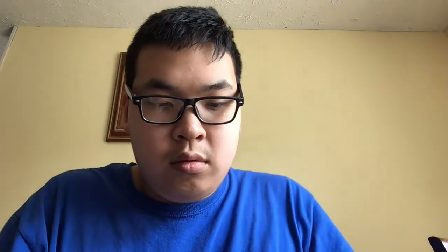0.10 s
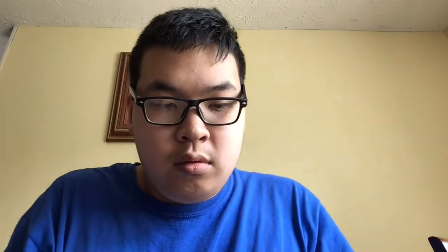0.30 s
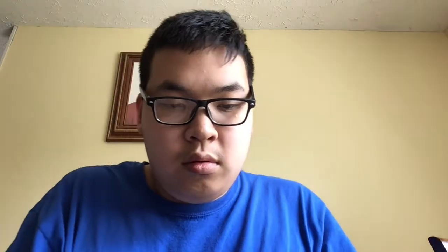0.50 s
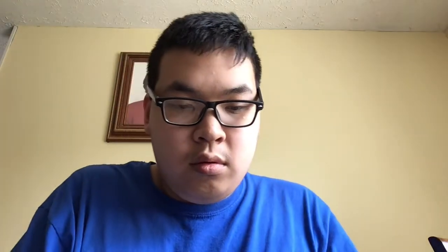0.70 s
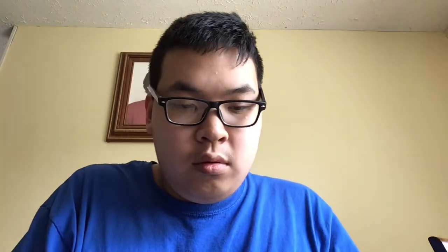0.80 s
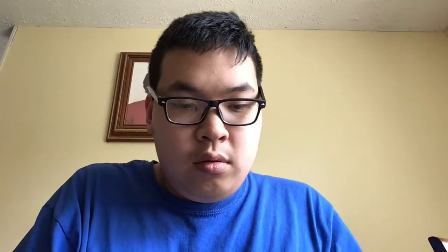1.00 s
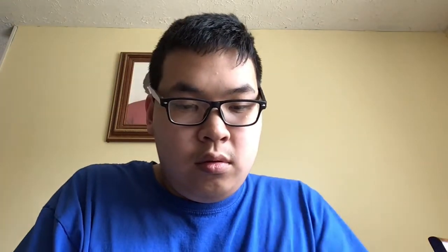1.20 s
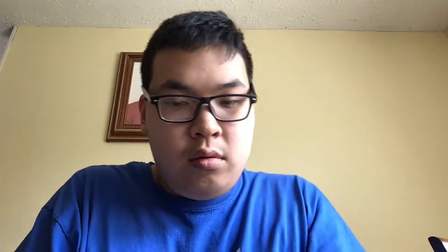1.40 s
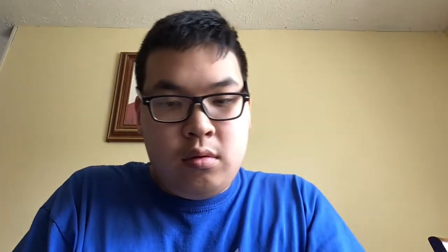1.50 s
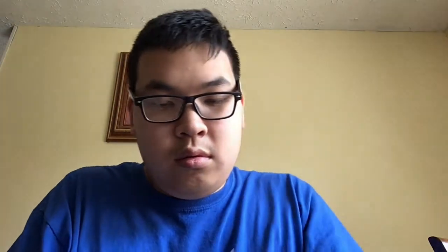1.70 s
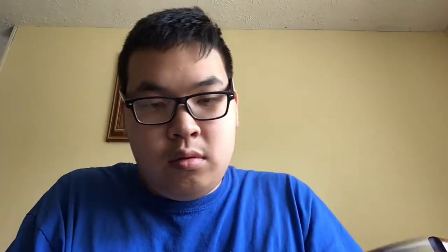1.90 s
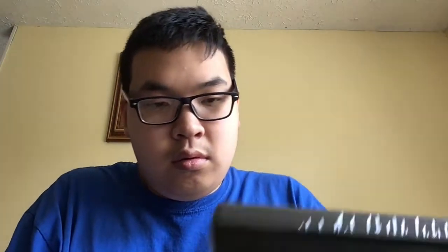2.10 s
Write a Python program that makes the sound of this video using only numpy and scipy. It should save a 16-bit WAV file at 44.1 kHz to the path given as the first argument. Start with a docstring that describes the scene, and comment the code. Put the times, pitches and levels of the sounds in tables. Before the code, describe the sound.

A shrink-wrapped plastic case is knocked and handled on a desk, with snaps and faint crinkling.

```python
"""Knocks, scrapes, snaps and crinkles: hands turn a shrink-wrapped plastic case over a desk in a small room.
Short pushes ring the desk and the case, random slips make the dragging, and noise bursts make the snaps.
Many tiny ringing creases make the crinkle. A sine makes the distant motor tone, and filtered noise makes
the narrow hiss, the room tone and the microphone noise. A close laptop microphone trims bass and treble."""
import sys
import numpy as np
from scipy import signal
from scipy.fft import rfft, irfft
from scipy.io import wavfile
from scipy.ndimage import uniform_filter1d

SR = 44100
rng = np.random.default_rng(int(sys.argv[2]) if len(sys.argv) > 2 else 0)


def wrap_up_sound(samples):
    """Save the sound to the file named by the first command line argument, as 16-bit audio."""
    columns = np.atleast_2d(samples).T
    # keep every value between -1 and 1, then stretch to whole-number steps
    tamed = np.clip(columns, -1, 1)
    steps = np.round(tamed * 32767).astype(np.int16)
    wavfile.write(sys.argv[1], SR, steps)


N = 92610
T = np.arange(N) / SR

# the ways the plastic case can ring: (frequency [Hz], level [dB], time to fade by 60 dB [s])
CASE_MODES = [(587, -3, 0.3), (660.3, 7, 0.078), (718.4, 12, 0.04), (819, 9.5, 0.033), (930.5, 0, 0.045),
              (1188, -8, 0.24), (1241, -4, 0.079), (1448, -23, 0.127), (1500, -15.5, 0.15),
              (1862, -33.5, 0.074)]


def undb(db):
    """Turn decibels into a plain gain."""
    return 10 ** (np.asarray(db) / 20)


def curve(rows, column=1):
    """Join the points of one table column with straight lines over time."""
    rows = np.array(rows, float)
    return np.interp(T, rows[:, 0], rows[:, column])


def unit(x):
    """Scale a sound to an average (RMS) level of 1."""
    return x / np.sqrt(np.mean(x ** 2))


def fade(t60, size):
    """Die away steadily, losing 60 dB in t60 seconds."""
    return np.exp(-np.log(1000) * np.arange(size) / SR / t60)


def colour(x, points):
    """Shape a spectrum by (frequency [Hz], gain [dB]) points, joined on a log frequency scale."""
    points = np.array(points, float)
    hz = np.maximum(np.arange(N // 2 + 1) * SR / N, 1)
    gain_db = np.interp(np.log(hz), np.log(points[:, 0]), points[:, 1])
    return irfft(rfft(x) * undb(gain_db), N)


def band(x, hz, width):
    """Keep the sound around one frequency, as a resonance does; width is in Hz."""
    sharpness = max(hz / width, .3)
    return signal.lfilter(*signal.iirpeak(min(hz, SR / 2.3), sharpness, fs=SR), x)


def walk(rate):
    """Wander slowly at random, with about `rate` new values per second and a spread of 1."""
    hold = int(SR / rate)
    steps = np.repeat(rng.standard_normal(N // hold + 1), hold)
    return unit(uniform_filter1d(steps, hold)[:N])


def ring(force, modes, rise=0.013):
    """A pushed body rings in decaying modes that swell over `rise` cycles; a unit push peaks near 1."""
    t = T[:SR // 2]
    body = np.zeros(len(t))
    for hz, db, t60 in modes:
        swell = 1 - np.exp(-t * hz / rise)
        body += undb(db) * fade(t60, len(t)) * swell * np.sin(2 * np.pi * hz * t)
    return signal.fftconvolve(force, body / np.abs(body).max())[:N]


def slips(rate, spread_db):
    """Surfaces that stick and slip give sparse random impulses of very uneven size."""
    chance, side, size = rng.random((N, 3)).T
    happens = chance < rate / SR
    return happens * np.sign(side - .5) * undb(-spread_db * np.log(size + 0.0021))


def bursts(rows, width):
    """Each sudden release is a dying noise burst about its own centre, with a narrow ring and a tick."""
    size = 4096
    out = np.zeros(N + size)
    for (s, db, hz, ms), noise in zip(rows, rng.standard_normal((len(rows), size))):
        shape = fade(max(ms, 2) / 1000, size)
        broad = band(band(noise * shape, hz, hz * width), hz, hz * 2)
        narrow = undb(4) * 2 * band(noise * shape, hz, hz / 6)
        # a bright tick, gone in about 3 ms and weaker for bursts centred below 4 kHz
        tick = undb(-2.5) * noise * fade(0.0032, size) * min(hz / 4000, 1)
        burst = broad + narrow + tick
        # even out the strength, so that the table alone sets how loud each burst is
        burst = burst / np.sqrt(np.sum(burst ** 2) / np.sum(shape ** 2)) / 2
        start = int(s * SR)
        out[start:start + size] += undb(db) * burst
    return out[:N]


def knocks():
    """Each knock is a short, smooth push that makes the desk top and the case ring together."""
    # knocks: (start [s], push on desk [dB], push on case [dB], contact time [ms])
    knock_rows = [(.063, -58, -55, 0.9), (0.12, -49, -44, 0.33), (0.2013, -23, -14.5, 0.13),
                  (0.2023, -37.5, -36, 0.98), (0.2117, -26.5, -9.5, 1.42), (0.227, -24.5, -19, 0.27),
                  (.675, -50.5, -49, 0.89), (0.728, -50.5, -38.5, 1.2), (0.762, -52.5, -74, 3.06),
                  (0.842, -50, -49, 0.73), (.872, -46.5, -25.5, 2.13), (1.126, -55, -39.5, 2.1),
                  (1.315, -20, -54, 2), (1.345, -29, -22, 2.08), (1.356, -63, -26, 1.38),
                  (1.428, -43.5, -60, 0.54), (1.497, -37.5, -37, 1.03), (1.514, -29.5, -42, 3.9),
                  (1.58, -35.5, -24.5, 1.2), (1.6, -47.5, -65, 0.39), (1.614, -55, -58, 2.5),
                  (1.695, -54.5, -46, 0.36), (1.707, -69, -38.5, 0.14), (1.77, -63.5, -38.5, 1.43),
                  (1.83, -58.5, -49, 1.5), (1.871, -54, -66, 7.2), (1.947, -57, -49.5, 1),
                  (2.043, -65.5, -72, 0.6), (2.07, -68, -72, 0.17)]
    # the ways the desk top can ring: (frequency [Hz], level [dB], time to fade by 60 dB [s])
    desk_modes = [(142, -7, 0.23), (181.1, -2, 0.27), (210.8, -6.5, 0.23), (237.7, 1, 0.23),
                  (292, -1.5, 0.15), (311.2, -5, 0.19), (399, -5, 0.16), (445, -7.5, 0.12)]
    desk_force, case_force = np.zeros(N), np.zeros(N)
    for s, desk_db, case_db, ms in knock_rows:
        ramp = np.clip(1 - np.abs(2 * (T - s) / (ms / 1000) - 1), 0, 1)
        push = np.sin(np.pi / 2 * ramp) ** 2  # rounds the triangle into a raised cosine
        push = push / push.sum()
        desk_force += undb(desk_db) * push
        case_force += undb(case_db) * push
    # a desk mode takes about 0.41 cycles to swell, so the bass comes late
    return ring(desk_force, desk_modes, rise=0.41) + ring(case_force, CASE_MODES)


def dragging():
    """The case sticks and slips along the desk; the slips ring its three lowest modes."""
    # dragging loudness: (time [s], level [dB])
    drag_level = [(.99, -73), (1.004, -53), (1.018, -51.5), (1.03, -45), (1.05, -50), (1.07, -50.5),
                  (1.095, -76)]
    slips_per_s = 500
    scrape = ring(slips(slips_per_s, spread_db=3), CASE_MODES[:3])
    scrape = unit(band(scrape, 563, width=500))
    moving = (T > drag_level[0][0]) * (T < drag_level[-1][0])
    return scrape * undb(curve(drag_level)) * moving


def snaps():
    """The film snaps in lone, wide noise bursts."""
    # snaps: (start [s], level [dB], centre [Hz], time to fade by 60 dB [ms])
    snap_rows = [(0.0623, -58, 4280, 26), (0.0718, -56.5, 4200, 35), (0.1196, -58, 2530, 27),
                 (0.1263, -46, 2780, 60), (0.2055, -23.5, 2880, 47), (0.2064, -59, 2910, 10),
                 (0.2293, -34.5, 3960, 20), (0.241, -38, 3710, 24), (0.7284, -44.5, 2780, 60),
                 (0.84, -53.5, 2960, 40), (0.8593, -31.5, 2630, 19.2), (0.9193, -50.5, 5760, 60),
                 (0.9704, -51, 4400, 16), (0.9896, -57, 3300, 22), (1.0103, -53, 2960, 42),
                 (1.0256, -47.5, 4300, 29), (1.064, -45, 3600, 19), (1.0778, -46.5, 4270, 8.9),
                 (1.1218, -54, 4160, 40), (1.3021, -60, 3980, 45), (1.3134, -39, 3900, 11),
                 (1.3533, -34, 4600, 30), (1.433, -43.5, 5270, 38), (1.4861, -47, 3666, 12),
                 (1.5005, -38, 3170, 15), (1.5157, -32, 6800, 7), (1.5249, -35, 2900, 7.2),
                 (1.5524, -61, 3900, 17), (1.5745, -42.5, 4270, 17), (1.5815, -31.5, 3100, 6.7),
                 (1.6554, -53, 3082, 44), (1.67, -47, 4630, 20), (1.696, -41.5, 1900, 15),
                 (1.7067, -39.5, 2750, 44), (1.8329, -39.5, 6600, 9.2), (1.9475, -73, 2673, 13.4),
                 (1.9714, -71, 2800, 11.4), (2.0006, -65, 2740, 17), (2.045, -57, 3840, 13),
                 (2.071, -34, 3000, 6.7)]
    return bursts(snap_rows, width=3.08)  # band width divided by centre


def crackles():
    """Stiff folds and the case lid crackle in narrow noise bursts with a clearer pitch than the snaps."""
    # crackles: (start [s], level [dB], centre [Hz], time to fade by 60 dB [ms])
    crackle_rows = [(.2, -22, 1300, 55), (.203, -26, 380, 150), (.213, -38.5, 1550, 170),
                    (.2003, -37, 4240, 16), (.7285, -44.5, 1390, 24), (.84, -52, 1510, 28),
                    (.8598, -43.5, 2660, 6.6), (.8598, -44, 7100, 9.1), (1.125, -53, 1590, 42),
                    (1.315, -38.5, 1420, 22), (1.358, -39.5, 1400, 16), (1.499, -38.5, 1280, 34),
                    (1.501, -36, 870, 82), (1.527, -44, 1460, 14), (1.582, -35.5, 1390, 18.4),
                    (1.688, -41, 1080, 18), (1.697, -37.5, 1850, 22), (1.707, -37.5, 1110, 42),
                    (1.7, -40, 620, 98), (1.713, -38, 970, 34), (1.72, -54, 1850, 8.3),
                    (1.745, -53, 1505, 23), (1.772, -41.5, 934.5, 12), (1.8, -55, 4400, 15),
                    (1.947, -65.5, 1110, 60), (2.0, -48.5, 1360, 12), (2.018, -71, 1490, 5.3),
                    (2.043, -60, 980, 42), (2.045, -42.5, 10600, 11), (2.082, -44, 5105, 17),
                    (1.018, -48.5, 9980, 10), (1.678, -47, 9450, 8), (1.575, -44.5, 9600, 10.8),
                    (2.07, -47.5, 1250, 18)]
    return bursts(crackle_rows, width=0.37)  # band width divided by centre


def crinkle():
    """Between the snaps the film folds in a dense shower of tiny creases, ringing at ten pitches."""
    # crinkle loudness: (time [s], level [dB])
    crinkle_level = [(0, -69), (.06, -100), (.075, -65.5), (.14, -66), (.17, -56), (.195, -55), (.205, -55),
                     (.285, -57), (.3, -64), (.38, -83), (.5, -103), (.66, -76), (.68, -67), (.8, -63.5),
                     (.85, -74.5), (.87, -53), (.94, -70.5), (.96, -67), (1.08, -65), (1.15, -68),
                     (1.18, -78), (1.295, -83), (1.31, -58.5), (1.34, -52.5), (1.355, -46.5), (1.38, -64),
                     (1.42, -55.5), (1.44, -60), (1.47, -60.5), (1.52, -59.5), (1.56, -62.5), (1.6, -59.5),
                     (1.64, -66), (1.7, -61), (1.74, -66.5), (1.82, -61.5), (1.87, -69), (2., -59.5),
                     (2.06, -60.5), (2.1, -57.5)]
    # balance of the crinkle: (frequency [Hz], relative level [dB])
    crinkle_colour = [(300, -13), (700, 6.5), (1500, -1.5), (3000, -2.5), (5500, -5), (8000, -5.5),
                      (11000, -13), (16000, 3)]
    creases_per_s, spread_db = 6900, 2.5
    shower = np.zeros(N)
    for hz in 500 * 2 ** np.arange(0, 5, .5):  # ten pitches, half an octave apart
        creases = slips(creases_per_s / 10, spread_db) * undb(2.5 * walk(50))
        width = hz * 0.39
        ringing = unit(band(band(creases, hz, width), hz, width))
        shower += np.sqrt(hz) * ringing  # higher bands are wider, so they need more power
    flicker_db = 1.5 * walk(40)
    return unit(colour(shower, crinkle_colour)) * undb(curve(crinkle_level) + flicker_db)


def rumble():
    """Hands shifting on the desk push it in small random slips, heard as a dull grainy rumble."""
    # rumble loudness: (time [s], level [dB])
    rumble_level = [(0, -67), (.08, -68.5), (.19, -48.5), (.35, -55.5), (.5, -74), (.66, -73.5), (.7, -61),
                    (.8, -57.5), (.95, -69), (1.13, -69), (1.2, -78.5), (1.3, -73), (1.4, -60), (1.55, -46),
                    (1.65, -59.5), (1.8, -66.5), (1.9, -61.5), (1.95, -83), (2.1, -69)]
    # balance of the rumble: (frequency [Hz], relative level [dB])
    rumble_colour = [(60, -7.5), (140, 0), (240, 2.5), (350, -3.5), (500, -9.5), (900, -21.5), (2000, -49)]
    grains = slips(300, spread_db=0.83)
    return unit(colour(grains, rumble_colour)) * undb(curve(rumble_level))


def room(x):
    """Echoes off the walls blur into a noise-like tail whose treble dies sooner than its bass."""
    size = SR // 2
    split_hz, bass_t60_s, treble_t60_s = 2440, 0.36, 0.25
    low_pass = signal.butter(1, split_hz, "low", fs=SR, output="sos")
    high_pass = signal.butter(1, split_hz, "high", fs=SR, output="sos")
    bass = signal.sosfilt(low_pass, rng.standard_normal(size)) * fade(bass_t60_s, size)
    treble = signal.sosfilt(high_pass, rng.standard_normal(size)) * fade(treble_t60_s, size)
    tail = undb(-2) * bass + treble
    # the echo is kept to sound above 450 Hz, so the bass stays dry
    tail = signal.sosfilt(signal.butter(2, 450, "high", fs=SR, output="sos"), tail)
    tail = tail / np.sqrt(np.sum(tail ** 2))
    tail = np.r_[np.zeros(150), tail]  # the tail starts 150 samples (3.4 ms) late
    return x + undb(-13) * signal.fftconvolve(x, tail)[:N]


def thuds():
    """Dull blows shake the desk frame, which rings only in a few low modes."""
    # thuds: (time [s], level [dB])
    thud_rows = [(0.032, -50.5), (0.091, -67), (0.206, -35.5), (0.677, -47.5), (0.871, -44.5), (1.127, -52),
                 (1.315, -34.5), (1.35, -31.5), (1.499, -34), (1.522, -42), (1.599, -53), (1.7, -51),
                 (1.819, -47.5), (1.871, -47), (2.049, -55)]
    # the ways the desk frame can ring: (frequency [Hz], level [dB], time to fade by 60 dB [s])
    frame_modes = [(45.7, -9.5, 0.07), (67.6, 2.5, 0.14), (84.5, 2, 0.077), (111.3, 0.5, 0.11)]
    force = np.zeros(N)
    for s, db in thud_rows:
        force[int(s * SR)] += undb(db)
    return ring(force, frame_modes, rise=1.1)


def motor_tone():
    """A distant motor hums as one sine whose pitch drifts and whose loudness wavers."""
    # motor: (time [s], pitch [Hz], level [dB])
    motor_rows = [(0, 146, -64.5), (.05, 150.6, -64), (.18, 152.6, -50), (.4, 139.6, -90), (.55, 110, -73),
                  (.75, 116.3, -83), (1., 122, -62), (1.15, 120.7, -67.5), (1.3, 128.1, -64),
                  (1.5, 136, -56), (1.7, 140.7, -57), (1.9, 148.3, -54.5), (2.1, 145.8, -60)]
    turns = np.cumsum(curve(motor_rows)) / SR
    tone = np.sqrt(2) * np.sin(2 * np.pi * turns)
    waver_db = 1.5 * walk(12.19)
    return tone * undb(curve(motor_rows, column=2) + waver_db)


def narrow_hiss():
    """Noise squeezed into three bands makes a hiss that swells and fades."""
    # shape of the hiss loudness, lowered by 2.5 dB below: (time [s], level [dB])
    hiss_level = [(0, -127), (.1, -81), (.3, -69.5), (.85, -71), (1.1, -88), (1.2, -94), (2.1, -105)]
    # bands of the hiss: (centre [Hz], width [Hz], relative level [dB])
    hiss_bands = [(1110, 900, -0.5), (2745, 680, -2), (3075, 190, -3)]
    hiss = np.zeros(N)
    for hz, width, db in hiss_bands:
        noise = rng.standard_normal(N)
        hiss += undb(db) * unit(band(band(noise, hz, width), hz, width))
    return hiss * undb(curve(hiss_level) - 2.5)


def room_tone():
    """Random noise shaped towards the bass makes the room's own background sound."""
    # room tone loudness: (time [s], level [dB])
    tone_level = [(0, -69.5), (.3, -60.5), (1.1, -63.5), (1.2, -71), (1.29, -65), (1.35, -52.5),
                  (2.1, -66.5)]
    # balance of the room tone: (frequency [Hz], relative level [dB])
    tone_colour = [(15, -40), (25, 0), (53, 9), (72, -11), (105, 0.5), (242, -16.5), (451, -16), (936, -35),
                   (1160, -19.5), (1700, -34), (2990, -21.5), (3430, -42), (3820, -25), (6000, -32),
                   (9000, -43.5), (16000, -41)]
    return unit(colour(rng.standard_normal(N), tone_colour)) * undb(curve(tone_level))


def microphone_noise():
    """The microphone's own noise is a faint, steady, very wide band of hiss."""
    return unit(band(rng.standard_normal(N), 5000, width=9700)) * undb(-80)


def scene():
    """Put the handling sounds in the room, then add the thuds and the background without echo."""
    handling = knocks() + dragging() + snaps() + crackles() + crinkle() + rumble()
    background = motor_tone() + narrow_hiss() + room_tone() + microphone_noise()
    mix = room(handling) + thuds() + background
    return mix[None]  # one channel


def record(dry):
    """The laptop microphone drops the lowest bass, dulls the treble and cuts the top."""
    low_cut_hz, treble_loss_hz, top_hz = 69, 10200, 16300
    x = signal.sosfilt(signal.butter(4, low_cut_hz, "high", fs=SR, output="sos"), dry)
    x = signal.sosfilt(signal.butter(2, treble_loss_hz, fs=SR, output="sos"), x)
    return signal.sosfilt(signal.ellip(10, .2, 70, top_hz, fs=SR, output="sos"), x)


dry = scene()
out = record(dry)
wrap_up_sound(out)
```